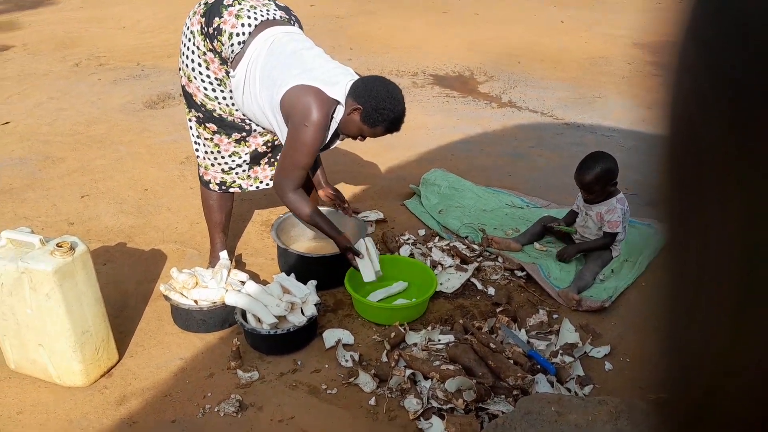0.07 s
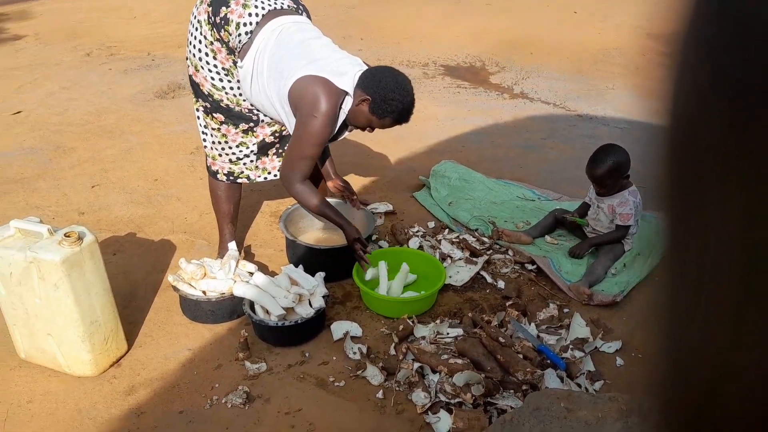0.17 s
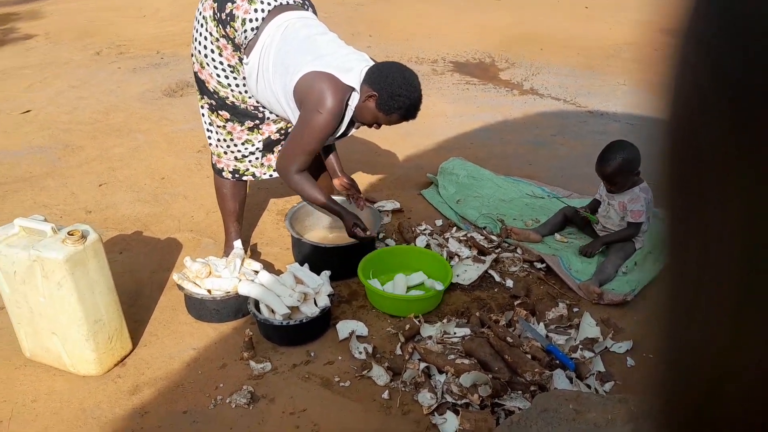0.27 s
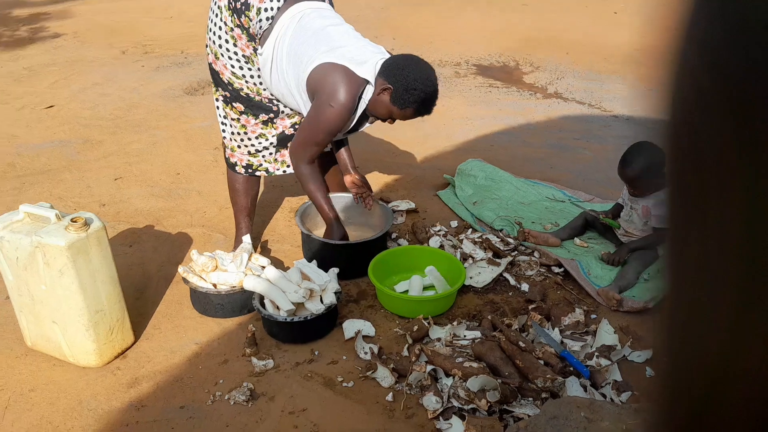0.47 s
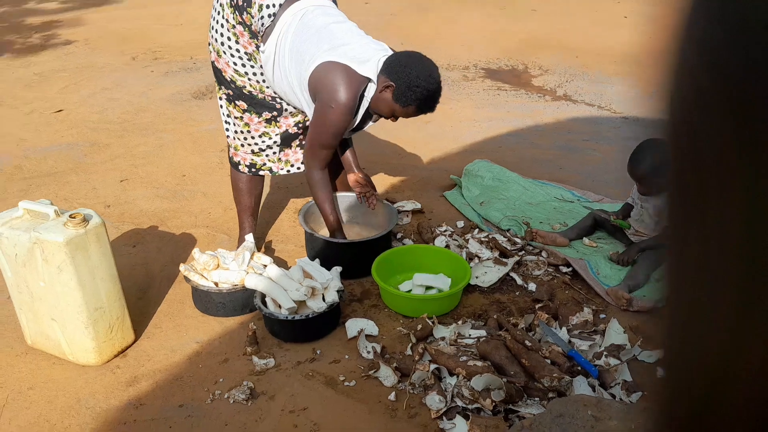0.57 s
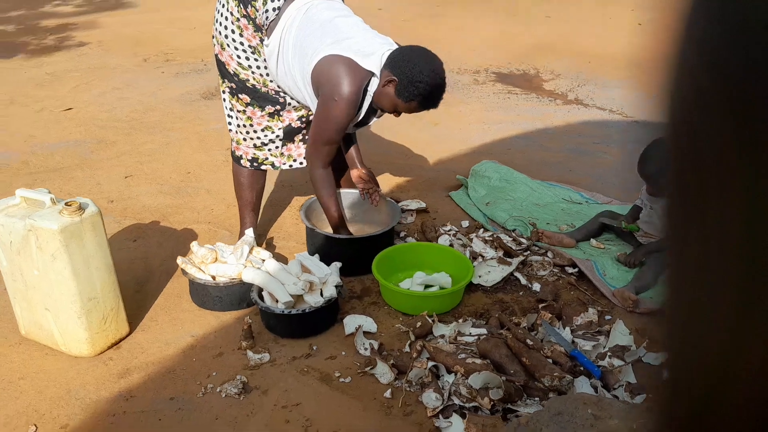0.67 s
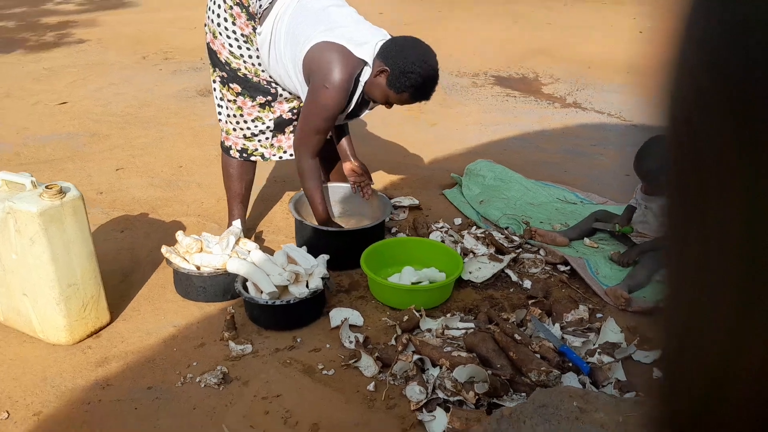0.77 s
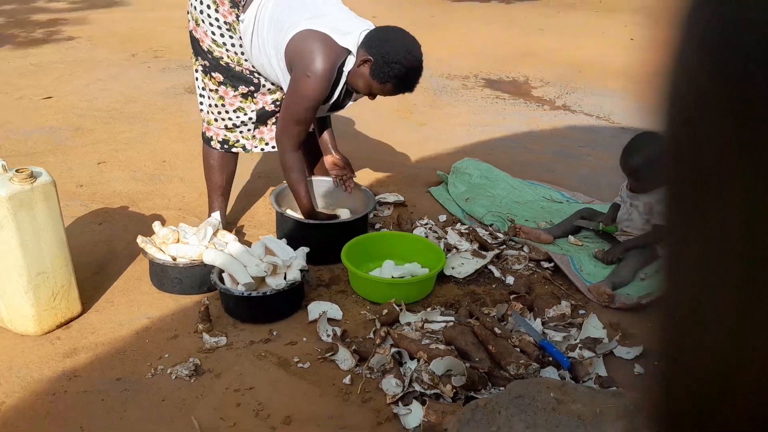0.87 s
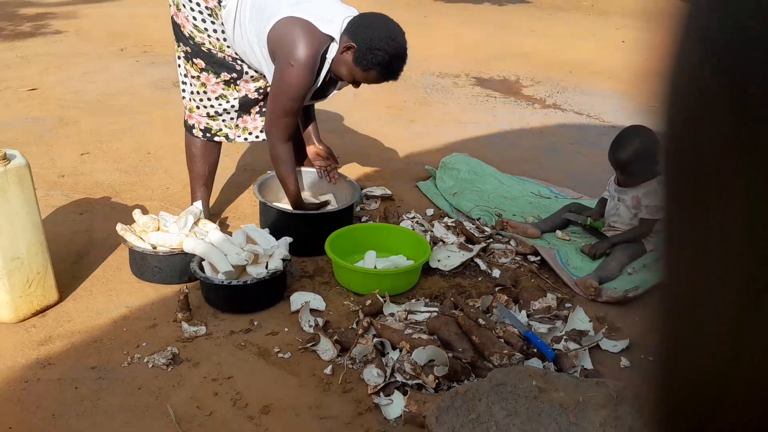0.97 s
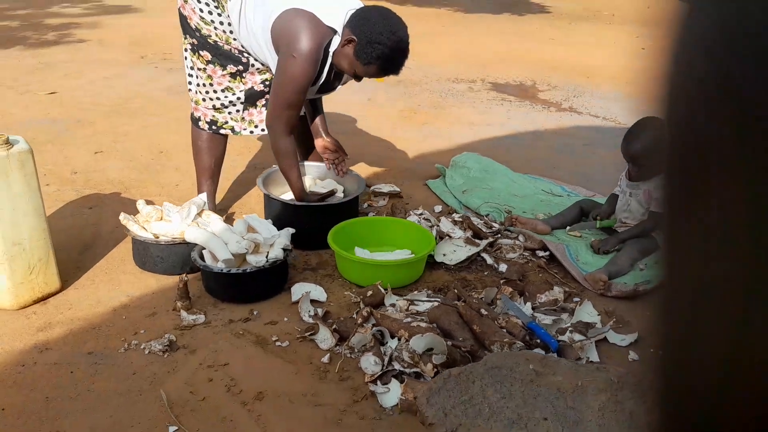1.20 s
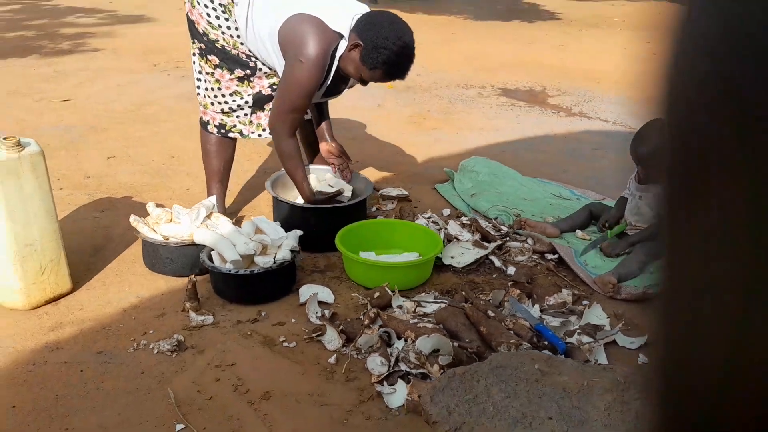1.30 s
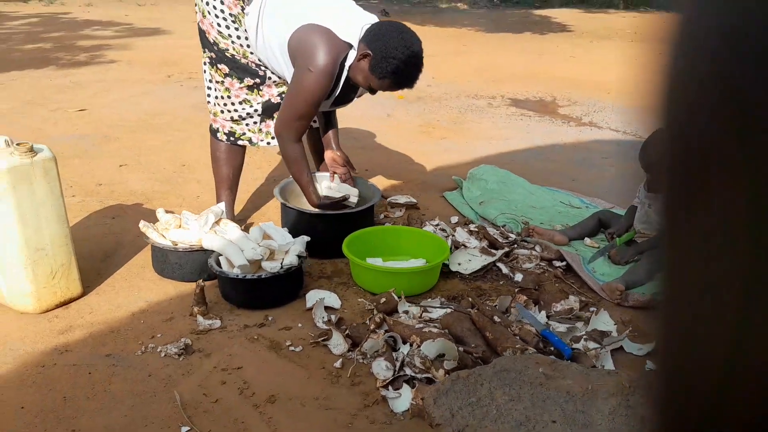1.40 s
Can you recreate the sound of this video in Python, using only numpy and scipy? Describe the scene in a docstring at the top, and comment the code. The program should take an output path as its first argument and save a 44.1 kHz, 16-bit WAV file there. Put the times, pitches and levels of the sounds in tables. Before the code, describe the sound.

Wet peeled roots tumble into a plastic basin from about 0.2 to 0.5 seconds, a quick run of hollow knocks, thumps and wet smacks as they slide and settle. Soft water swishing follows. From about 1.0 to 1.4 seconds a hand washes roots in a metal pot, with quieter splashes, drips, bubbles and a few light bumps. Faint outdoor air and a low rumble lie underneath.

```python
"""Peeled cassava roots tumble into a plastic basin, knocking, slithering and settling in an open yard.
Each impact excites damped modes, and bursting films of water add wet smacks. Then the hand goes back
to washing in a metal pot: the stirred water swishes, drips and trapped air bubbles ring briefly,
and roots bump each other and the wall. Faint air noise and a low rumble lie underneath."""
import sys
import numpy as np
from scipy import signal
from scipy.fft import rfft, irfft
from scipy.io import wavfile

SR = 44100
rng = np.random.default_rng(int(sys.argv[2]) if len(sys.argv) > 2 else 0)


def output_pcm(signal):
    """Save a mono or channel-first signal as 16-bit PCM at the path in sys.argv[1].

    Samples are clipped to [-1, 1] before scaling.
    """
    pcm = np.clip(np.atleast_2d(signal).T, -1, 1) * 32767
    wavfile.write(sys.argv[1], SR, np.round(pcm).astype(np.int16))


N = 63945
TIME = np.arange(N) / SR

# Levels are relative within each table; positive pan_db favours the left.
# Spectra of the air, the rumble, the stirred water and the sliding roots: frequency_hz, level_db
AIR_SPECTRUM = [(88, -44), (150, -5), (348, -23), (589, -6.5), (837, -9.5), (905, -14), (1240, -14.5),
                (2020, -12), (3100, -33), (6390, -1.5), (8230, -21), (12700, -16), (16000, -23)]
RUMBLE_SPECTRUM = [(25, -12), (50, 0), (80, 6.5), (120, 0.5), (200, -7.5), (350, -17.5), (700, -26.5),
                   (2000, -84)]
SWISH_SPECTRUM = [(200, -3), (400, 5.5), (900, -12.5), (1300, -2.5), (1800, 6.5), (3000, 3), (4500, 2.5),
                  (6600, 2.5), (8500, -12.5), (13000, -12.5), (16000, -11.5)]
SLITHER_SPECTRUM = [(200, -0.5), (400, 0.5), (700, 3), (1000, -9), (1350, -4), (1900, -23), (3000, -13.5),
                    (4500, -20), (6800, -15.5), (8500, -27.5), (13000, -27.5), (16000, -22.5)]
# Envelopes of the rumble, the stirring, the bubbles against the swish, the sliding: time_s, level_db
RUMBLE_ENVELOPE = [(0, -72.5), (.2, -69), (.3, -47.5), (.42, -51), (.55, -59.5), (.6, -73), (.7, -67.5),
                   (.74, -60), (.8, -62.5), (.92, -63.5), (.97, -63), (1.1, -56), (1.16, -70.5),
                   (1.22, -56.5), (1.28, -60), (1.45, -59.5)]
SWISH_ENVELOPE = [(0, -76.5), (.21, -65.5), (.25, -65), (.38, -65), (.5, -56), (.56, -67), (.68, -63),
                  (.735, -56), (.79, -57), (.9, -57), (1.0, -55), (1.05, -58.5), (1.125, -53.5),
                  (1.16, -63), (1.2, -59.5), (1.24, -59), (1.34, -57.5), (1.45, -59.5)]
BUBBLE_ENVELOPE = [(0, -36), (.22, -19), (.3, 11), (.5, -4), (.58, -39.5), (.93, -28.5), (1.0, 5),
                   (1.38, -1), (1.45, -14)]
SLITHER_ENVELOPE = [(0, -110), (.218, -100), (.228, -53), (.28, -43.5), (.315, -55), (.335, -46.5),
                    (.39, -47), (.415, -54), (.49, -48.5), (.52, -63), (.57, -79.5), (1.45, -110)]
# Roots striking the basin, and each other in the pot: start_s, thud_db, body_db, clack_db, smack_db
BASIN_KNOCKS = [(.2250, -39, -45.5, -36.5, -43.5), (.2282, -51, -33.5, -35.5, -41.5),
                (0.2393, -37, -30.5, -40, -42), (.2530, -60, -36, -57, -58.5),
                (0.256, -37, -35.5, -35.5, -35.5), (0.2595, -32, -37, -31, -39),
                (0.2646, -64, -32, -55, -44), (.2790, -53, -39.5, -59, -45), (.2865, -32, -41, -51, -50),
                (0.2929, -45, -42, -52, -61.5), (0.3252, -43.5, -33.5, -38.5, -44),
                (.3280, -39.5, -28.5, -27.5, -33.5), (0.3521, -34.5, -25, -32, -47.5),
                (.3565, -33, -35.5, -35.5, -52), (0.3724, -49.5, -34.5, -33, -48.5),
                (0.387, -51.5, -37, -55, -53.5), (0.399, -45, -48, -61.5, -59), (0.43, -53, -57, -50, -61),
                (0.4382, -42.5, -42, -44.5, -49), (.4840, -52, -54, -50.5, -58),
                (.5340, -74, -60.5, -61.5, -78)]
POT_KNOCKS = [(0.9988, -83, -60, -51, -52), (1.1829, -78, -78, -48.5, -48.5),
              (1.1872, -63, -46, -43, -51.5), (1.1946, -55.5, -50.5, -61, -52.5),
              (1.2162, -65, -60, -52, -77), (1.3339, -71, -61.5, -53.5, -61),
              (1.351, -123, -58.5, -54.5, -60)]
# Normal modes of the basin, the roots and the filled pot: frequency_hz, level_db, t60_s
BASIN_MODES = [(95, -1, 0.3), (138.2, 8.5, 0.059), (190, 0, 0.2), (214, 1, 0.11), (314, -5, 0.065),
               (381, 4, 0.037), (439, 1, 0.093), (513, 1.5, 0.074), (582, 4.5, 0.048), (630.3, -5, 0.14),
               (708, -4, 0.11), (760, -17.5, 0.072), (1290, 1, 0.0085), (1368, 5.5, 0.02),
               (1556, -1.5, 0.028), (1822, 3, 0.018), (2048, -9, .02), (2596, -16.5, 0.069)]
ROOT_MODES = [(104, -1, 0.11), (165, -5, 0.081), (421, 7, .035), (658, 20, 0.021), (787, 14, 0.024),
              (1147, 2.5, 0.04), (1527, 7.5, 0.028), (1856, 7.5, 0.043), (2250, -4, 0.039)]
POT_MODES = [(512, 0, 0.26)]
# Spectra of wet bursts in the basin, muffled in the pot, and as spatter: frequency_hz, level_db
BASIN_SMACK_SPECTRUM = [(1500, -1), (2600, -0.5), (4200, 2), (5300, -5), (6800, 0.5), (8500, -15),
                        (12500, -9.5), (16000, -26)]
POT_SMACK_SPECTRUM = [(1500, -3), (2600, 12.5), (4000, 1), (6500, -4), (8500, -18), (16000, -31)]
SPATTER_SPECTRUM = [(1500, -7.5), (2800, -4.5), (4200, 1), (7000, -0.5), (9000, -16), (12500, -7),
                    (16000, -11)]
# Thumps and low basin booms as heavy roots land: start_s, pitch_hz, level_db, t60_s
THUMPS = [(0.256, 155, -26.5, 0.12), (0.2925, 91.5, -32, 0.18), (.3255, 615, -18, 0.036),
          (0.3515, 455, -14, 0.025), (0.371, 93.5, -31.5, 0.28), (.4300, 105, -24, 0.034),
          (0.4753, 410, -31, 0.037), (.5340, 388, -48, 0.042), (1.1933, 405, -38, 0.022),
          (1.197, 113.5, -39, 0.08)]
# Spatters and sprays of water: start_s, level_db, decay_s, pan_db
SPATTERS = [(.2570, -45, 0.0024, 7.5), (.2790, -52, .003, 0.5), (.3282, -35.5, 0.0022, 4.5),
            (.5412, -50, 0.0023, 5.5), (.5475, -53.5, 0.0022, -0.5), (.625, -66.5, 0.0071, 2),
            (.9788, -43, 0.0024, 0), (.9995, -49, 0.0017, -8), (1.129, -57, 0.0013, 18),
            (1.245, -56, 0.0041, -3), (1.268, -64, 0.022, -11), (1.300, -56, 0.00081, 7),
            (1.320, -69, 0.063, -15)]
# Drips, bubbles and low gulps: start_s, pitch_hz, level_db, t60_s, pan_db
PLOPS = [(.672, 261.3, -58, 0.05, 1), (.812, 370, -54, 0.19, 0), (0.956, 172, -49, 0.15, 5),
         (1.004, 198, -52.5, 0.18, 4), (1.0465, 1240, -21, 0.0077, 31), (1.0605, 980, -41.5, 0.024, 2),
         (1.104, 282, -47, 0.045, 8), (1.118, 690, -46, 0.095, 7), (1.121, 2725, -34.5, 0.022, 0.5),
         (1.196, 2880, -44.5, 0.045, 2), (1.2132, 1190, -41.5, 0.027, 7), (1.214, 3350, -51, 0.06, 6.5),
         (1.246, 4090, -56, 0.06, 9), (1.3327, 1710, -37.5, .012, -13)]
# Soft bumps on the pot wall: start_s, level_db
WALL_BUMPS = [(1.092, -50), (1.1214, -60.5), (1.24, -65), (1.31, -65)]
# Likeness of the noise at the two sides: frequency_hz, correlation
STEREO_CORRELATION = [(50, 0.86), (300, 0.49), (900, 0.23), (2000, 0.37), (6000, 0.17), (15000, 0.6)]
# Level difference between the two sides: frequency_hz, pan_db
STEREO_BALANCE = [(60, -2.5), (250, 2), (600, 2.5), (1300, -3), (2300, 4), (4400, 8), (8000, 4), (15000, 1)]

DROPLETS_PER_S, DROPLET_SPREAD_DB = 3000, 4.5
BUBBLES_PER_S, BUBBLE_CYCLES, BUBBLE_SPREAD_DB = 150, 12, 6
BUBBLE_LOW_HZ, BUBBLE_PITCH_RATIO, BUBBLE_RISE_PER_S = 1580, 2.56, 1.8
SWELLS_PER_S, SWELL_DB = 45, 1.86
LOWEST_HZ, THUD_TOP_HZ, BODY_TOP_HZ = 70, 260, 1000
CONTACT_S, SKID_S, BLOW_S = 0.00071, 0.004, 0.008
LOAD_DETUNE = 0.046  # shifting roots load the vessel and detune its modes from blow to blow
HARD_BLOW_DB, DULLING = -33.5, 0.203  # treble lost, in dB per octave, for each dB below a hard blow
SMACK_S, SPRAY_S, SPRAY_DB = 0.0024, 0.0068, -20
CRACKLE_SPREAD_DB, CRACKLE_GRAIN_S = 2, 0.0003
AIR_DB, YARD_DB, YARD_T60_S = -70, -12, 0.29
LEFT_LEAD_S, CUTOFF_HZ = 0.00015, 16000
LEFT_RIGHT = np.array([[1], [-1]])


def from_db(db):
    """Amplitude grows tenfold for every 20 dB."""
    return 10 ** (np.asarray(db) / 20)


def unit_rms(x):
    """Normalisation to unit mean power."""
    return x / np.sqrt(np.mean(x ** 2) + 1e-20)


def envelope(points):
    """Gain over time, interpolated in decibels."""
    return from_db(np.interp(TIME, *np.transpose(points)))


def at_hz(points, hz):
    """Interpolation on a logarithmic frequency axis."""
    frequencies, values = np.transpose(points)
    return np.interp(np.log(hz + 1), np.log(frequencies), values)


def add(out, start_s, sound):
    """Superposition: a sound adds to the mix from its start time."""
    start = int(start_s * SR)
    out[..., start:start + sound.shape[-1]] += sound[..., :N - start]


def low_cut(x, hz, order):
    """A high-pass filter attenuates motion below its corner frequency."""
    return signal.sosfilt(signal.butter(order, hz, "high", fs=SR, output="sos"), x)


def colour(x, spectrum):
    """A minimum-phase filter imposes a spectrum that falls away below its first point."""
    hz = np.arange(2049) * SR / 4096
    gain = from_db(at_hz(spectrum, hz)) / (1 + (spectrum[0][0] / 2 / (hz + 1)) ** 2)
    cepstrum = irfft(np.log(gain + 1e-5))
    causal = np.r_[cepstrum[0], 2 * cepstrum[1:2048]]
    response = irfft(np.exp(rfft(causal, 4096)))
    return signal.fftconvolve(x, response[None], axes=-1)[:, :x.shape[-1]]


def widen(three):
    """Partial coherence: one shared signal is mixed with an independent one for each side."""
    alike = np.clip(at_hz(STEREO_CORRELATION, np.arange(N // 2 + 1) * SR / N), 0, 1)
    spectra = rfft(three)
    return irfft(np.sqrt(alike) * spectra[0] + np.sqrt(1 - alike) * spectra[1:], N)


def noise(spectrum):
    """Filtering turns white noise into coloured stereo noise of unit rms."""
    return unit_rms(colour(widen(rng.standard_normal((3, N))), spectrum))


def background():
    """Broadband noise: steady faint air and a low rumble that rises and falls."""
    return from_db(AIR_DB) * noise(AIR_SPECTRUM) + envelope(RUMBLE_ENVELOPE) * noise(RUMBLE_SPECTRUM)


def bubble(hz, t60_s):
    """Trapped air resonates as a damped oscillator whose pitch rises slightly."""
    t = TIME[:SR // 6]
    amplitude = from_db(-60 * t / t60_s) * (1 - np.exp(-4 * hz * t))
    phase = 2 * np.pi * hz * t * (1 + BUBBLE_RISE_PER_S * t / 2)
    return low_cut(amplitude * np.sin(phase), hz / 2, order=2)


def stirred_water():
    """Flow noise, random droplet impulses and resonating bubbles share small uneven swells."""
    sizes = from_db(DROPLET_SPREAD_DB * np.minimum(rng.exponential(1, (3, N)), 4))
    sizes *= rng.choice([-1, 1], (3, N))
    impulses = sizes * (rng.random((3, N)) < DROPLETS_PER_S / SR)
    droplets = unit_rms(colour(widen(impulses), SWISH_SPECTRUM))
    swish = from_db(-3.5) * noise(SWISH_SPECTRUM) + from_db(-4) * droplets
    bubbles = np.zeros((2, N))
    for when, pitch, strength, side in rng.random((int(BUBBLES_PER_S * N / SR), 4)):
        hz = BUBBLE_LOW_HZ * BUBBLE_PITCH_RATIO ** pitch
        gain = from_db(BUBBLE_SPREAD_DB * strength + 4 * (side - .5) * LEFT_RIGHT)
        add(bubbles, when * TIME[-1], gain * bubble(hz, BUBBLE_CYCLES / hz))
    bubbling = from_db(-6) * envelope(BUBBLE_ENVELOPE) * unit_rms(bubbles)
    swells = from_db(SWELL_DB * np.interp(TIME * SWELLS_PER_S, np.arange(400), rng.standard_normal(400)))
    return envelope(SWISH_ENVELOPE) * swells * (swish + bubbling)


def ringing(modes, detune, tilt_db_per_octave):
    """An impulse response is a sum of damped modes; here it has unit rms over the blow."""
    t = TIME[:SR // 3]
    wave = 0
    for hz, db, t60_s in modes:
        shift = 1 + detune * rng.uniform(-1.186, 1)
        # Modes radiate unevenly to the two sides, the low ones least.
        side_db = 6 * min(hz / BODY_TOP_HZ, 1) * rng.uniform(-1.2, 1) * LEFT_RIGHT
        gain = from_db(db + side_db + tilt_db_per_octave * np.log2(hz))
        wave = wave + gain * from_db(-60 * t / t60_s) * np.sin(2 * np.pi * hz * shift * t)
    wave *= 1 - np.exp(-t / CONTACT_S)  # soft flesh slows the onset
    return wave / np.sqrt(np.mean(wave[:, :int(BLOW_S * SR)] ** 2))


def knocks(rows, modes):
    """Impact excitation: a tap and a short skid drive low, middle and high modes, each at its level."""
    out, t = np.zeros((2, N)), TIME[:SR // 30]
    bands = [(LOWEST_HZ, THUD_TOP_HZ), (THUD_TOP_HZ, BODY_TOP_HZ), (BODY_TOP_HZ, SR)]
    for band, (low_hz, high_hz) in enumerate(bands):
        band_modes = [mode for mode in modes if low_hz <= mode[0] < high_hz]
        for start_s, *levels_db in rows:
            response = ringing(band_modes, LOAD_DETUNE, DULLING * (levels_db[band] - HARD_BLOW_DB))
            force = rng.standard_normal(len(t)) * np.exp(-t / SKID_S)
            force /= np.linalg.norm(force)
            force[0] += 1  # the tap has as much energy as the skid
            blow = low_cut(signal.fftconvolve(response, force[None], axes=-1), low_hz, order=3)
            blow *= np.linalg.norm(response) / np.linalg.norm(blow)
            add(out, start_s, from_db(levels_db[band]) * blow)
    return out


def film_bursts(rows, spectrum, gain_db):
    """A rupturing water film gives an uneven crackle and a faint spray; bursts add in power."""
    power, t = np.zeros((2, N)), TIME[:SR // 6]
    attack = 1 - np.exp(-t / 0.00057)
    spray = from_db(SPRAY_DB) * np.exp(-t / SPRAY_S)
    for start_s, db, decay_s, pan_db in rows:
        gain = from_db(db + gain_db + pan_db * LEFT_RIGHT / 2)
        add(power, start_s, (gain * attack * (np.exp(-t / decay_s) + spray)) ** 2)
    grains = from_db(CRACKLE_SPREAD_DB * rng.standard_normal(N))[(TIME / CRACKLE_GRAIN_S).astype(int)]
    return np.sqrt(power) * unit_rms(grains) * noise(spectrum)


def smacks(knock_rows, spectrum):
    """Each impact of a wet root ruptures its film of water."""
    bursts = [(start_s, smack_db, SMACK_S, 0) for start_s, *_, smack_db in knock_rows]
    return film_bursts(bursts, spectrum, gain_db=6)


def slither():
    """Sliding friction between wet roots makes noise between the knocks."""
    return envelope(SLITHER_ENVELOPE) * noise(SLITHER_SPECTRUM)


def thumps():
    """Damped vibration: a heavy root lands with a brief thump or sets the basin booming low."""
    out, t = np.zeros((2, N)), TIME[:SR // 4]
    for start_s, hz, db, t60_s in THUMPS:
        amplitude = from_db(db - 60 * t / t60_s) * (1 - np.exp(-3 * hz * t))
        add(out, start_s, low_cut(amplitude * np.sin(2 * np.pi * hz * t), hz / 2, order=2))
    return out


def plops():
    """Each drip or gulp is a short snap with a bubble resonance."""
    out = np.zeros((2, N))
    snap = from_db(-13.5) * bubble(hz=3170, t60_s=0.0047)
    for start_s, hz, db, t60_s, pan_db in PLOPS:
        sides = from_db(pan_db * LEFT_RIGHT / 2)
        add(out, start_s, from_db(db) * sides / sides.mean() * (bubble(hz, t60_s) + snap))
    return out


def pot_wall():
    """Free vibration: the water-filled pot hums briefly in one mode when bumped."""
    out = np.zeros((2, N))
    for start_s, db in WALL_BUMPS:
        add(out, start_s, from_db(db) * ringing(POT_MODES, detune=0, tilt_db_per_octave=4))
    return out


def yard_reflections(x):
    """Scattering from ground, vessels and a wall leaves a short tail, different at each side."""
    t = TIME[:SR // 3]
    tail = rng.standard_normal((2, len(t))) * from_db(-60 * t / YARD_T60_S) * (t > .002)
    tail /= np.linalg.norm(tail, axis=1, keepdims=True)
    return from_db(YARD_DB) * signal.fftconvolve(x, low_cut(tail, hz=300, order=1), axes=-1)[:, :N]


def from_the_left(x):
    """Time and level differences give direction: the left side hears it earlier and brighter."""
    hz = np.arange(N + 1) * SR / (2 * N)
    half_db = at_hz(STEREO_BALANCE, hz) / 2
    left = from_db(half_db)
    right = from_db(-half_db) * np.exp(-2j * np.pi * hz * LEFT_LEAD_S)
    return irfft(rfft(x, 2 * N) * np.array([left, right]))[:, :N]


def scene():
    """Roots, water and background superpose; only the impacts and bursts are reflected."""
    blows = knocks(BASIN_KNOCKS, BASIN_MODES) + knocks(POT_KNOCKS, ROOT_MODES) + thumps() + pot_wall()
    blows += smacks(BASIN_KNOCKS, BASIN_SMACK_SPECTRUM) + smacks(POT_KNOCKS, POT_SMACK_SPECTRUM)
    blows += film_bursts(SPATTERS, SPATTER_SPECTRUM, gain_db=7.5)
    mix = slither() + background() + blows + yard_reflections(blows) + stirred_water() + plops()
    return from_the_left(mix)


def record(dry):
    """Band limiting: a steep low-pass filter removes the highest treble."""
    return signal.sosfilt(signal.ellip(10, .1, 70, CUTOFF_HZ, fs=SR, output="sos"), dry)


dry = scene()
out = record(dry)
output_pcm(out)
```